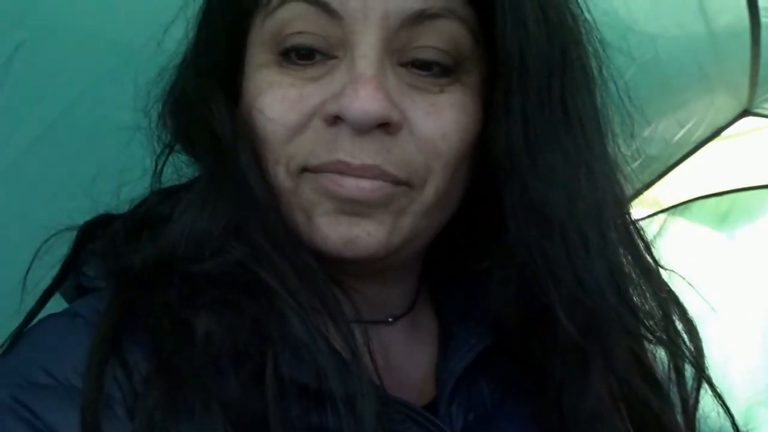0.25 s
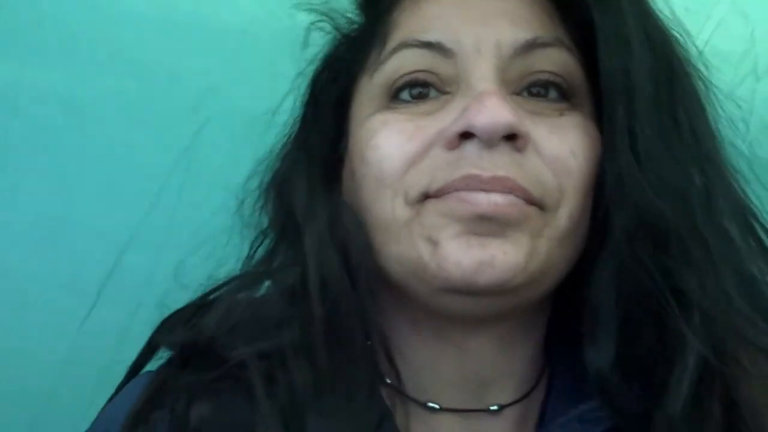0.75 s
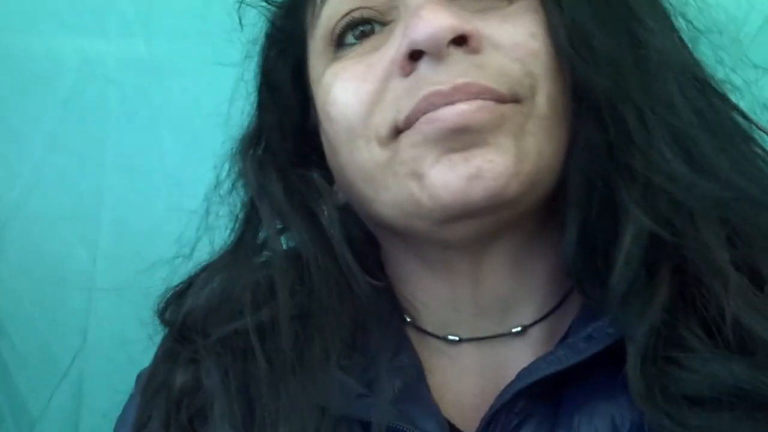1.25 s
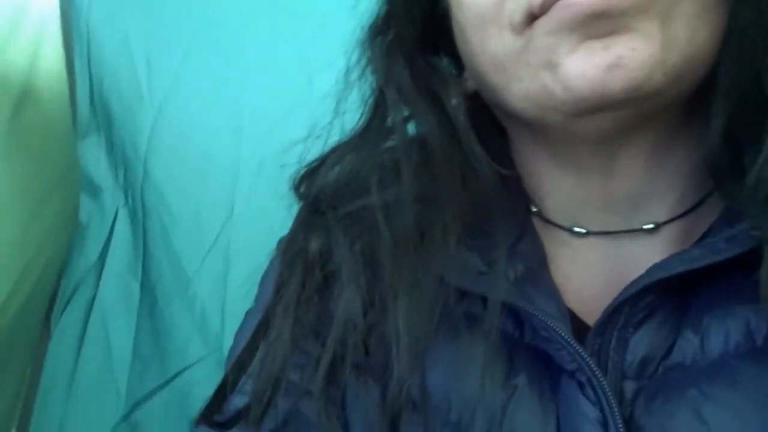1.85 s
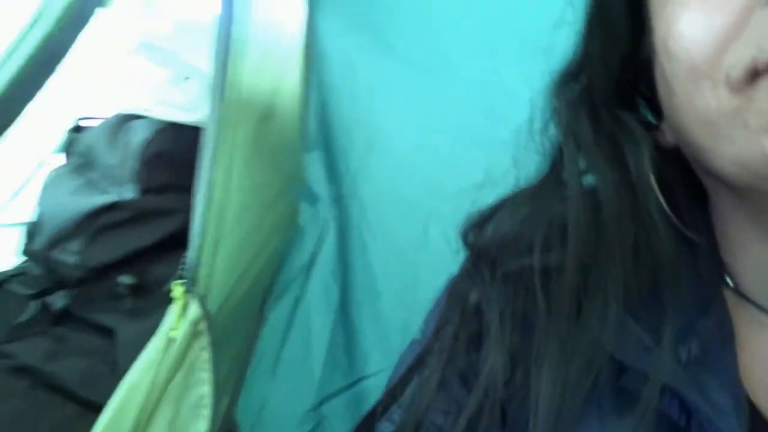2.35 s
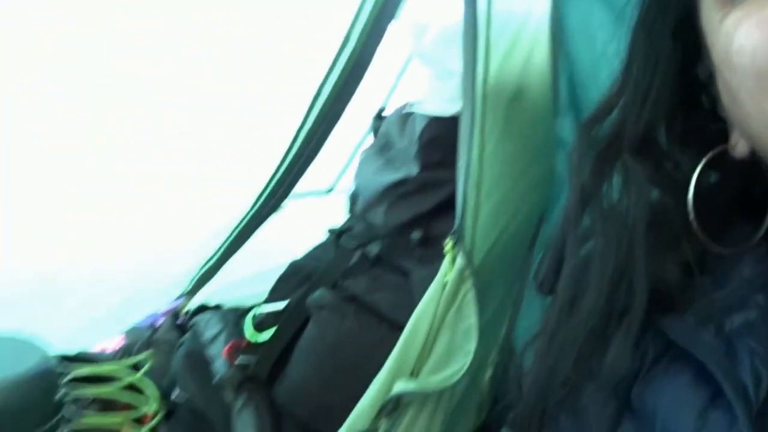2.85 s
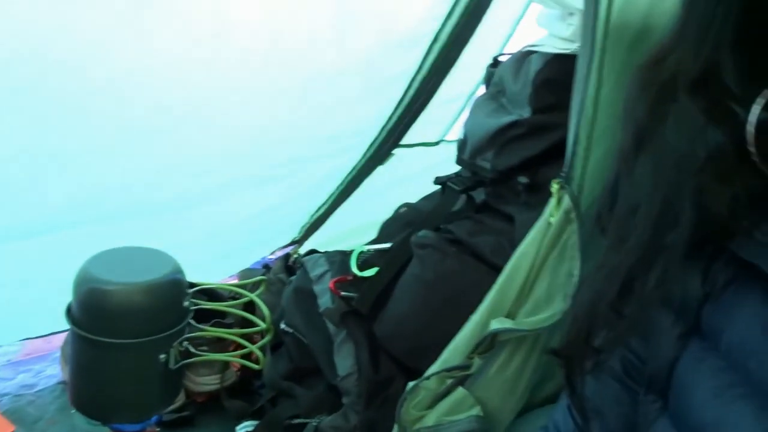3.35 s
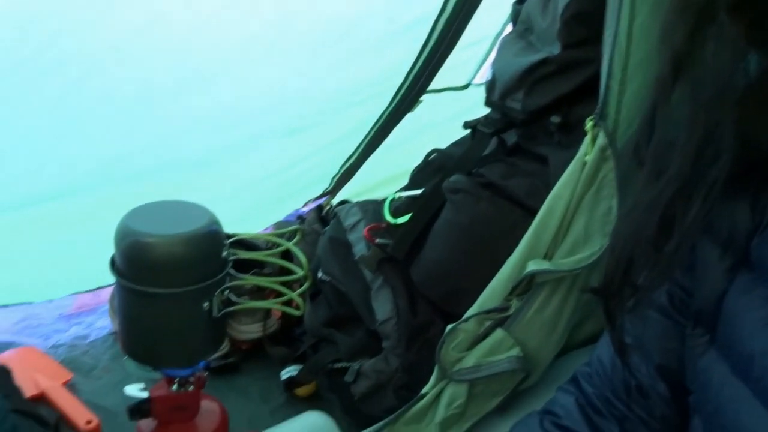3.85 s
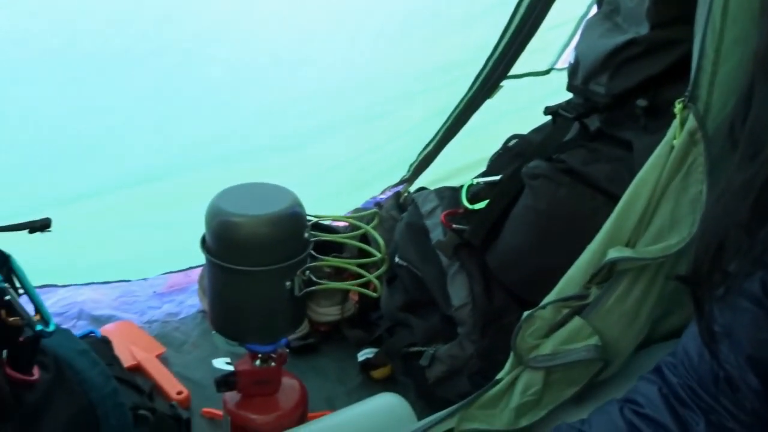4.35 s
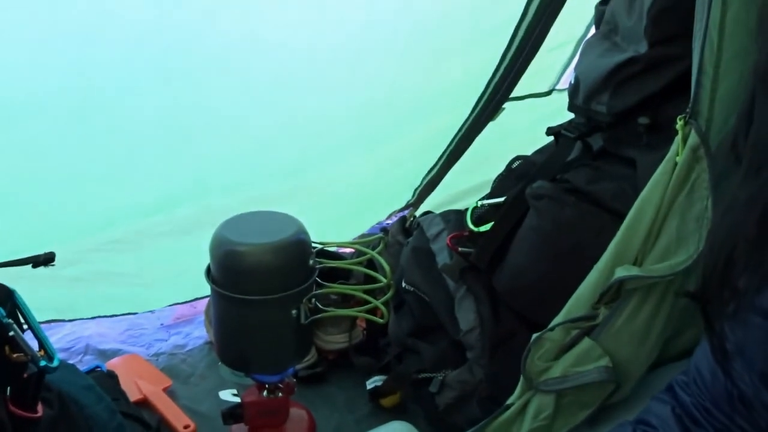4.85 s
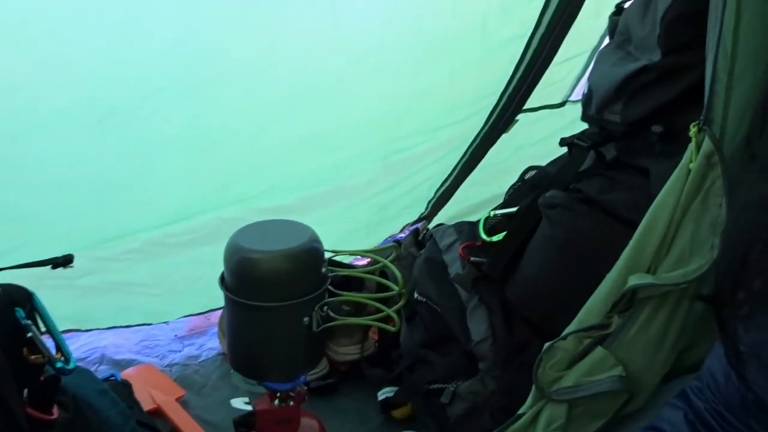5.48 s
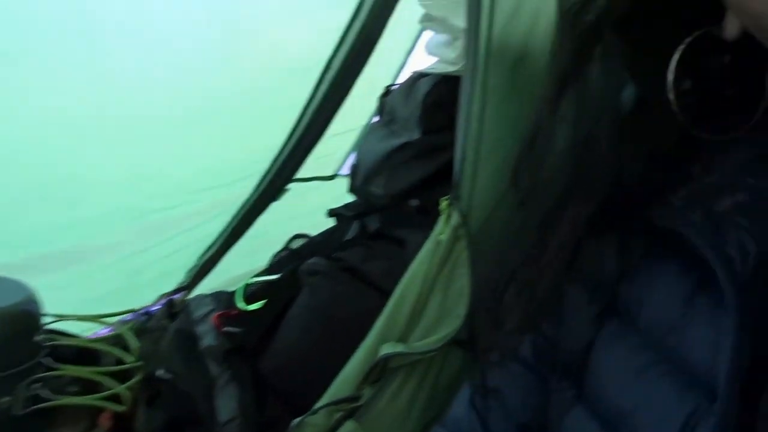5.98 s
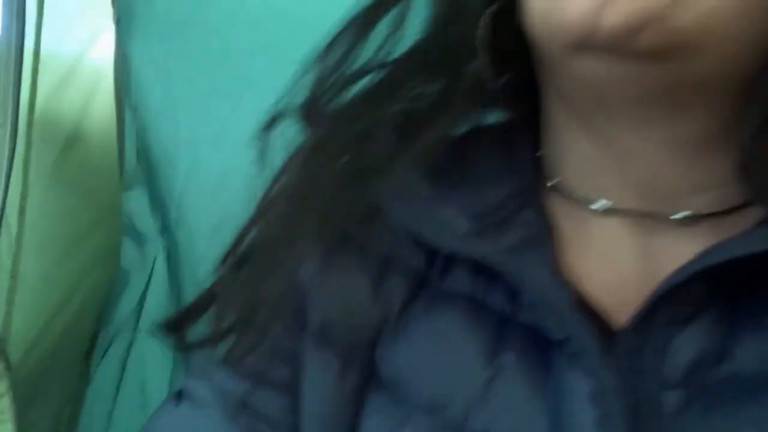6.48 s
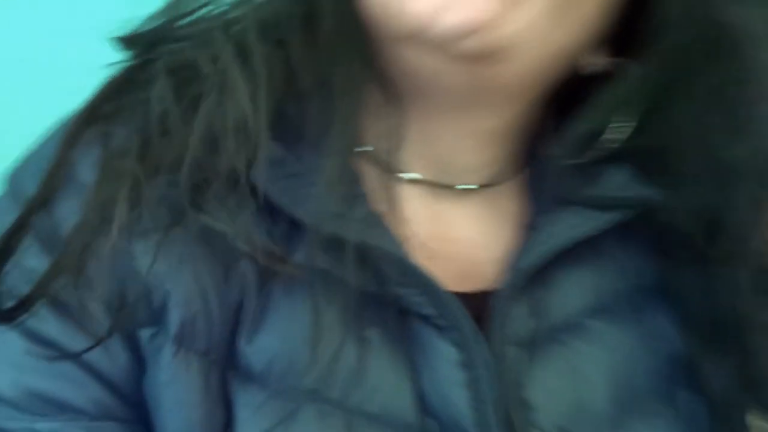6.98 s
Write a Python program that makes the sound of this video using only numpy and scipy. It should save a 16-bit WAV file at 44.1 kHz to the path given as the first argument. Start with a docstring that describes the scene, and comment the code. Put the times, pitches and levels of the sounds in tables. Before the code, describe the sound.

A small gas stove hisses steadily over a soft flame rumble inside a tent. Close to the hand-held microphone, a padded nylon jacket rubs and swishes, and fingers make a few sharp clicks and a dull knock on the plastic case early on. The hiss grows fuller as the microphone turns towards the stove, then eases as it turns away amid heavier rustling.

```python
"""A steady hiss over a soft flame rumble: a small gas stove under a pot in a tent, its turbulent jet
sounding through the burner's resonances. The hiss shifts as a hand-held recorder turns towards the
stove and back. Close by, a padded nylon jacket rubs, swishes and creases, and fingers click and knock
on the recorder's plastic case. A dull wash of air lies underneath."""
import sys
import numpy as np
from scipy import signal
from scipy.fft import rfft, irfft
from scipy.io import wavfile

SR = 44100
rng = np.random.default_rng(int(sys.argv[2]) if len(sys.argv) > 2 else 0)


def bounce(signal):
    """Save signal as a 16-bit WAV file at the path given by the first command-line argument."""
    frames = np.transpose(np.atleast_2d(signal))
    limited = np.clip(frames, -1, 1)
    pcm = np.round(limited * 32767).astype(np.int16)
    wavfile.write(sys.argv[1], SR, pcm)


N = 318344
T = np.arange(N) / SR
HZ = np.maximum(np.fft.rfftfreq(N, 1 / SR), 1)
CUTOFF_HZ = 11030
SIDE_SIGN = np.array([[1], [-1]])  # left, right microphone port


def from_db(db):
    """Decibels to gain."""
    return 10 ** (np.asarray(db) / 20)


def rms_one(x):
    """Scale to unit rms."""
    return x / np.sqrt(np.mean(x ** 2) + 1e-20)


def in_time(rows):
    """Interpolate each column after the time column to every sample."""
    times_s, *columns = np.transpose(rows)
    return [np.interp(T, times_s, column) for column in columns]


def at_hz(points, hz):
    """Read a spectrum on a log-frequency axis."""
    points_hz, values = np.transpose(points)
    return np.interp(np.log(hz), np.log(points_hz), values)


def drift(rate_hz):
    """Smooth random fluctuation, rms 1."""
    return rms_one(irfft(rfft(rng.standard_normal(N)) / (1 + (HZ / rate_hz) ** 2), N))


def resonance(centre_hz, width_hz):
    """Gain of a resonance, peak 1."""
    return 1 / (1 + 2 * ((HZ - centre_hz) / width_hz) ** 2)


def high_pass(x, hz):
    """Second-order bass cut."""
    return signal.sosfilt(signal.butter(2, hz, "high", fs=SR, output="sos"), x)


def to_right(db):
    """Port gains for a source on the right."""
    return from_db(-SIDE_SIGN * db / 2)


def add(out, start_s, sound):
    """Mix in a short sound."""
    start = max(round(start_s * SR), 0)
    out[..., start:start + sound.shape[-1]] += sound[..., :N - start]


def swell(centre_s, half_s):
    """Gaussian envelope, peak 1."""
    return np.exp(-np.minimum(((T - centre_s) / half_s) ** 2, 20))


def slide(start_s, end_s, attack_s=0.03, release_s=0.055):
    """Rise, hold and release of a sliding contact."""
    return np.exp(-np.maximum(start_s - T, 0) / attack_s - np.maximum(T - end_s, 0) / release_s) + 1e-9


def mid_side(mid, side, correlation):
    """Mix two independent noises into a correlated stereo pair."""
    correlation = np.clip(correlation, -1, 1)
    return np.sqrt(1 + correlation) * mid + np.sqrt(1 - correlation) * side * SIDE_SIGN


def stereo_noise(gain, hz=HZ, size=N, correlation=None, lead_rad=0):
    """Coloured stereo noise, rms 1; the left port may lead in phase."""
    # Likeness of the ports. Each row: frequency in Hz, correlation.
    default_correlation = [(30, -0.97), (150, 0.95), (350, 0.9), (800, 0.7), (2000, 0.5), (3300, 0.47),
                           (4600, -0.16), (6500, -0.32), (11000, -0.14)]
    mid, side = rfft(rng.standard_normal((2, size)))
    spectrum = mid_side(mid, side, at_hz(correlation or default_correlation, hz))
    return rms_one(irfft(gain * spectrum * np.exp(1j * SIDE_SIGN * lead_rad / 2), size))


def at_ports(gain, ports):
    """Coloured noise with a source's own correlation and phase lead per frequency."""
    correlation = [(hz, alike) for hz, alike, _ in ports]
    lead_rad = at_hz([(hz, lead) for hz, _, lead in ports], HZ)
    return stereo_noise(gain, correlation=correlation, lead_rad=lead_rad)


def gliding_band(centre_hz, width_hz, correlation, lead_rad=0):
    """Narrow stereo noise with a moving centre, rms 1."""
    spectrum = rfft(rng.standard_normal((2, 2, 1, N)))
    mid, side = irfft(spectrum / np.sqrt(1 + (2 * HZ / width_hz) ** 8), N)
    in_phase, quadrature = mid_side(mid, side, correlation)
    phase = 2 * np.pi * np.cumsum(centre_hz) / SR + SIDE_SIGN * lead_rad / 2
    return rms_one(in_phase * np.cos(phase) + quadrature * np.sin(phase))


def burst(centre_hz, octaves, size=8192):
    """Time axis and short noise with one spectral hump."""
    hz = np.maximum(np.fft.rfftfreq(size, 1 / SR), 1)
    hump = (hz < CUTOFF_HZ) / (1 + np.abs(np.log2(hz / centre_hz) / octaves) ** 3)
    return np.arange(size) / SR, stereo_noise(hump, hz, size)


def snap(t60_s, centre_hz, octaves):
    """A burst that starts near rms 1 and decays."""
    t, noise = burst(centre_hz, octaves)
    decay = from_db(-60 * t / t60_s)
    return rms_one(high_pass(noise * decay, hz=370)) * np.sqrt(np.mean(decay ** 2))


def air(waver_db=1.8, hollow_db=2.5):
    """Low, dull wash around the tent, with a hollow in its middle."""
    # Wash spectrum. Each row: frequency in Hz, relative density in dB.
    spectrum = [(25, -26), (60, -38), (100, -17), (170, -6), (260, -10.5), (400, 2.5), (580, -2.5),
                (900, -4.5), (1500, -16.5), (3000, -16.5)]
    # Wash loudness. Each row: time in seconds, level in dB.
    levels = [(0, -61), (0.6, -63.5), (1.9, -67.5), (2.28, -56.5), (2.55, -70.5), (4.9, -75), (5.55, -64),
              (6.05, -79), (6.6, -60.5), (7.22, -65.5)]
    level_db, = in_time(levels)
    colour_db = at_hz(spectrum, HZ) - hollow_db * resonance(centre_hz=550, width_hz=56)
    return from_db(level_db + waver_db * drift(6.7)) * stereo_noise(from_db(colour_db))


def folds(catch_db=2.0, settle_s=0.2):
    """Sliding folds ring hollow, catch, and sink in pitch as they open."""
    # Each row: start and end in seconds, level in dB, first and settled pitch in Hz.
    slides = [(0.34, 0.46, -58, 2642, 2546), (5.58, 5.68, -55, 1970, 1940), (6.305, 6.36, -51, 2120, 1950),
              (6.43, 6.88, -53, 1788, 1610)]
    gain, centre_hz = 0, np.full(N, float(slides[0][3]))
    for start_s, end_s, db, first_hz, settled_hz in slides:
        envelope = from_db(db) * slide(start_s, end_s)
        sinking_hz = settled_hz + (first_hz - settled_hz) * np.exp(-np.maximum(T - start_s, 0) / settle_s)
        centre_hz = np.where(envelope > gain, sinking_hz, centre_hz)  # loudest fold sets the pitch
        gain = np.maximum(gain, envelope)
    catching = from_db(catch_db * drift(40))
    return gain * catching * gliding_band(centre_hz, width_hz=310, correlation=1.0)


def drags(slips_per_s=1500, size_db=2.5):
    """Cloth drags on the case: creases give way in tiny uneven slips that set it ringing."""
    # Each row: start and end in seconds, level in dB.
    strokes = [(5.462, 5.51, -46), (5.582, 5.658, -42), (6.307, 6.9, -54)]
    # Case resonances under cloth. Each row: frequency and width in Hz, relative level in dB.
    modes = [(706, 125, 0), (1680, 220, -1), (1965, 46, 8.5), (2570, 59, 4), (2950, 99, 7.5),
             (3675, 160, 9.5), (4010, 120, 6.5), (4830, 83, 10), (5450, 100, 4.5), (6700, 250, -1)]
    sizes = from_db(size_db * np.minimum(rng.exponential(1, N), 4))
    slipping = rng.random(N) < slips_per_s / SR
    slips = slipping * sizes * (rng.standard_normal(N) + 0.13 * rng.standard_normal((2, N)))
    ring = 0
    for k, (hz, width_hz, db) in enumerate(modes):
        radius = np.exp(-np.pi * width_hz / SR)
        feedback = [1, -2 * radius * np.cos(2 * np.pi * hz / SR), radius ** 2]
        ring += (-1) ** k * from_db(db) * signal.lfilter([1 - radius, 0, radius - 1], feedback, slips)
    gain = sum(from_db(db) * slide(start_s, end_s) for start_s, end_s, db in strokes)
    return gain * rms_one(ring)


def jacket(sheen_boost_db=3.5, split_hz=4300, catch_db=1.5, grain_db=0.74):
    """Nylon rubs low when pressed and hisses high when gliding; the weave catches in tiny grains."""
    # Arm movement. Each row: time in seconds, rub level in dB, brightness in dB.
    motion = [(0, -53, 1), (0.22, -60, 4), (0.42, -52, -2.5), (0.74, -46.5, -2), (0.97, -46, -4),
              (1.28, -58, -1), (1.66, -61.5, -0.5), (2.1, -51.5, -0.5), (2.4, -50, 1), (2.88, -51.5, 0.5),
              (3.5, -57.5, 2), (4.25, -67.5, 6), (4.95, -63.5, -3), (5.3, -55, -5), (5.6, -52.5, 7.5),
              (5.86, -55, -2), (6.52, -42.5, -1.5), (6.92, -43.5, -9), (7.22, -56.5, -1)]
    # Sleeve swishes. Each row: centre in seconds, sheen before its boost in dB, rub in dB.
    swishes = [(0.1, -51.5, -54.5), (0.61, -67, -71), (0.86, -47, -56), (1.21, -52, -65),
               (1.385, -50.5, -55.5), (1.85, -56, -55.5), (2.02, -56, -46), (3.335, -50, -65),
               (3.57, -54, -66), (3.7, -52, -58), (3.893, -42, -47.5), (4.045, -51.5, -55),
               (4.396, -50, -57), (5.22, -61, -60), (5.49, -53, -67), (5.775, -48.5, -46.5),
               (5.962, -48.5, -47), (6.32, -71, -58)]
    # Nylon spectrum. Each row: frequency in Hz, relative density in dB.
    spectrum = [(200, -32), (400, -22), (800, -4.5), (1250, -4.5), (1650, -1), (2200, 1.5), (2900, 2.5),
                (3600, 5), (4800, 3), (6500, 1.5), (8500, 0.5), (11000, -3)]
    # Nylon at the ports. Each row: frequency in Hz, correlation, left lead in radians.
    ports = [(300, 0.67, 0.5), (1800, 0.59, 0.07), (3200, 0.54, -0.9), (4830, 0.44, -2.3), (7540, 0.41, -3),
             (10800, 0.11, -3.0)]
    motion_db, bright_db = in_time(motion)
    rub_gain, sheen_gain = from_db(motion_db), from_db(motion_db + bright_db)
    for centre_s, sheen_db, rub_db in swishes:
        envelope = swell(centre_s, half_s=0.053)
        rub_gain = np.hypot(rub_gain, from_db(rub_db) * envelope)
        sheen_gain = np.hypot(sheen_gain, from_db(sheen_db) * envelope)
    colour = from_db(at_hz(spectrum, HZ))
    low_share = 1 / (1 + (HZ / split_hz) ** 5)
    rub = rub_gain * at_ports(colour * np.sqrt(low_share), ports)
    sheen = sheen_gain * from_db(sheen_boost_db) * at_ports(colour * np.sqrt(1 - low_share), ports)
    return (rub + sheen + folds()) * from_db(catch_db * drift(21) + grain_db * drift(700))


def brushes(catch_db=1.5):
    """Quick scuffs of cloth on the case swell and fade, catching unevenly."""
    # Each row: peak time in seconds, level in dB, half length in seconds, centre in Hz, width in octaves.
    scuffs = [(0.079, -43, 0.003, 2900, 0.87), (0.091, -37, 0.0049, 3440, 0.53),
              (2.004, -39.5, 0.0042, 2200, 0.25), (2.04, -42, 0.0064, 2480, 0.26),
              (2.131, -46.5, 0.021, 3240, 0.32), (2.355, -41.5, 0.011, 4170, 0.4),
              (3.881, -34, 0.0083, 3700, 1.4), (3.894, -38, 0.006, 6000, 1.2),
              (5.404, -38, 0.0066, 5300, 0.54), (5.571, -53.5, 0.0091, 268, 0.14),
              (5.489, -44, 0.03, 5040, 0.17), (5.588, -38, 0.012, 4440, 1.4),
              (5.64, -39.5, 0.004, 3000, 1.2), (5.675, -35, 0.0035, 4700, 0.61),
              (5.768, -39.5, 0.024, 4700, 0.46), (6.318, -43, 0.025, 4050, 0.12),
              (6.479, -52.5, 0.0091, 380, 0.35), (6.626, -52.5, 0.0055, 560, 0.67),
              (6.624, -44, 0.008, 2000, 0.13), (6.759, -38, 0.0049, 1240, 2.2),
              (6.778, -38.5, 0.0045, 1730, 1.2), (6.91, -36.5, 0.014, 1410, 2.04)]
    out = np.zeros((2, N))
    for peak_s, db, half_s, centre_hz, octaves in scuffs:
        t, noise = burst(centre_hz, octaves)
        add(out, peak_s - t.mean(), from_db(db) * noise / np.cosh((t - t.mean()) / half_s))
    return high_pass(out * from_db(catch_db * drift(110)), hz=231)


def snaps():
    """Nylon creases, light taps and the short ring of finger clicks on the case: sudden, fast-dying."""
    # Each row: start in seconds, level in dB, centre in Hz, width in octaves, t60 in seconds.
    creases_and_taps = [(0.0925, -39, 3640, 0.45, 0.025), (0.5518, -34.5, 1540, 0.35, 0.027),
                        (0.565, -37.5, 4000, 0.91, 0.037), (0.6373, -38, 1260, 0.31, 0.028),
                        (0.638, -35.5, 3000, 0.96, 0.031), (1.034, -35, 1600, 1.4, 0.043),
                        (1.0529, -23, 2520, 0.48, 0.025), (1.0565, -26, 820, 0.25, 0.018),
                        (1.063, -38.5, 850, 0.3, 0.03), (1.0762, -26.5, 1940, 0.27, 0.017),
                        (1.1166, -43, 1700, 0.82, 0.02), (1.243, -48.5, 616, 0.36, 0.04),
                        (1.25, -37, 1930, 0.4, 0.018), (1.516, -31, 2300, 0.36, 0.01),
                        (1.6738, -30.5, 2500, 1.74, 0.029), (1.813, -41, 1930, 0.12, 0.03),
                        (2.229, -40.5, 725, 0.82, 0.033), (2.2322, -28, 2400, 0.41, 0.031),
                        (2.3419, -38, 2350, 0.47, 0.028), (2.519, -39.5, 1400, 1.1, 0.024),
                        (3.1862, -42, 2160, 0.39, 0.027), (3.3333, -40.5, 2000, 0.49, 0.036),
                        (3.9135, -34, 2600, 1.1, 0.03), (3.914, -39.5, 715, 0.22, 0.032),
                        (3.915, -33.5, 2050, 0.39, 0.032), (3.976, -40.5, 860, 2.4, 0.032),
                        (4.4038, -40, 1770, 1.1, 0.028), (4.4442, -40.5, 1790, 2.2, 0.036),
                        (4.846, -39.5, 3330, 0.81, 0.039), (5.1657, -42.5, 1475, 1.3, 0.032),
                        (5.3912, -33.5, 2010, 2.9, 0.031), (5.5023, -41, 1800, 2.8, 0.034),
                        (5.5603, -28.5, 2300, 1.0, 0.034), (5.564, -29, 4940, 0.52, 0.035),
                        (5.5795, -28.5, 4300, 0.52, 0.03), (5.612, -39, 5000, 1.0, 0.02),
                        (5.6359, -37.5, 1300, 2.2, 0.04), (5.6655, -32.5, 3800, 1.0, 0.015),
                        (5.7678, -31, 5400, 0.2, 0.046), (5.797, -45, 2110, 0.89, 0.03),
                        (5.808, -42, 1900, 0.61, 0.025), (6.294, -35.5, 2505, 1.2, 0.035),
                        (6.459, -37, 1900, 1.4, 0.044), (6.525, -43, 2500, 0.84, 0.027),
                        (6.642, -28.5, 4200, 0.87, 0.041), (6.707, -44, 900, 0.23, 0.035),
                        (6.9991, -38.5, 1900, 0.78, 0.025)]
    out = np.zeros((2, N))
    for start_s, db, centre_hz, octaves, t60_s in creases_and_taps:
        add(out, start_s, from_db(db) * snap(t60_s, centre_hz, octaves))
    return out


def strike(modes, scatter_db, rock_hz=np.inf, size=4096):
    """One blow on the case: modes alternate in sign; the higher a mode, the more it rocks the ports against
    each other, a quarter cycle apart at rock_hz and nearing opposition far above."""
    hz, db, t60_s = np.transpose(modes)[:, :, None]
    t = np.arange(size) / SR
    polarity = (-1) ** np.arange(len(hz))[:, None]
    strength = polarity * from_db(db + scatter_db * rng.standard_normal((len(hz), 1)))
    rock_rad = SIDE_SIGN[:, :, None] * np.arctan(hz / rock_hz)
    return np.sum(strength * from_db(-60 * t / t60_s) * np.sin(2 * np.pi * hz * t + rock_rad), axis=1)


def handling():
    """Finger blows travel through the case: sharp clicks with a bright crack, and dull knocks."""
    # Each row: start in seconds, ring in dB, crack in dB, right minus left of the ring in dB.
    clicks = [(1.0494, -8.5, -28, -3.5), (1.0511, -21, -29, 10), (1.0554, -27, -29, -7),
              (1.0627, -32, -32, 0), (1.0753, -26, -25.5, 0), (2.2285, -9.5, -35, 0.5),
              (2.2315, -20.5, -43, 3)]
    # Each row: start in seconds, level in dB.
    knocks = [(1.6718, -25), (1.675, -28), (1.681, -32), (1.691, -15.5), (5.5616, -35), (6.758, -36),
              (6.904, -37), (6.913, -38)]
    # Modes of the ringing and of the gripped case. Each row: frequency in Hz, level in dB, t60 in seconds.
    case_modes = [(725, -38, 0.026), (1980, -20, 0.017), (2310, -12.5, 0.017), (2640, -14, 0.016),
                  (3320, -22, 0.022), (3910, -3, 0.011), (4330, 0.5, 0.011), (5500, -8.5, 0.02),
                  (5860, -10.5, 0.012), (9220, -18, 0.012)]
    grip_modes = [(187, -29.5, 0.018), (329, -17, 0.033), (757, -10, 0.0097), (985, -9, 0.019),
                  (1610, -20, 0.023), (2820, -12.5, 0.0056)]
    out = np.zeros((2, N))
    for start_s, ring_db, crack_db, pan_db in clicks:
        ring = strike(case_modes, scatter_db=2.5, rock_hz=2900)
        add(out, start_s, from_db(ring_db) * ring * to_right(pan_db))
        add(out, start_s, from_db(crack_db) * snap(t60_s=0.016, centre_hz=8800, octaves=1.0))
    for start_s, db in knocks:
        add(out, start_s, from_db(db) * strike(grip_modes, scatter_db=2.0) * to_right(db=3.5))
    return out


def burner_bands(exposure, lift_db, waver_db=1.2, wander_hz=25):
    """Three hiss bands shift and grow as the recorder comes into the burner's path."""
    # Each row: shadowed and direct centre in Hz, width in Hz, shadowed and direct level in dB,
    # share of the lift, shadowed and direct left lead in radians.
    bands = [(3860, 3500, 287, -57, -54, 0.77, 1.45, 0.33), (4315, 4090, 330, -57, -50.5, -0.17, 2.2, 1.1),
             (4750, 5060, 160, -65.5, -61.5, 0.3, 1.9, 0.63)]
    out = 0
    for shadow_hz, direct_hz, width_hz, shadow_db, direct_db, share, shadow_rad, direct_rad in bands:
        band_db = shadow_db + exposure * (direct_db - shadow_db) + share * lift_db + waver_db * drift(27)
        centre_hz = shadow_hz + exposure * (direct_hz - shadow_hz) + wander_hz * drift(4)
        lead_rad = shadow_rad + exposure * (direct_rad - shadow_rad)
        out += from_db(band_db) * gliding_band(centre_hz, width_hz, correlation=0.93, lead_rad=lead_rad)
    return out * to_right(db=0.9)


def stove(shadow_db=-60, direct_db=-50, flutter_db=0.8):
    """Turbulent gas: a broad hiss with hollows and bands, over resonances of flame, pot and burner."""
    # Recorder aim. Each row: time in seconds, exposure (0 shadowed, 1 direct), hiss gain in dB,
    # band lift in dB.
    aim = [(0, 0.072, -5, 6), (0.4, 0.0011, 2, -4), (1.2, 0.58, -0.5, -1), (1.7, 0.52, 1, -5),
           (2.35, 0.15, 2, 2), (2.6, 0.08, 6, -3.5), (2.73, 0.13, 4, 5), (2.97, 0.3, 0.5, 9.5),
           (3.18, 0.59, -1, 7.5), (3.45, 0.81, -2, 2.5), (4.1, 0.94, 0, -1), (5.35, 0.98, 0, -3.5),
           (5.95, 0.95, 0.5, -6), (6.33, 0.26, 4, 2), (6.75, 0.13, -1.5, -13), (7.22, 0.21, -2.5, 3)]
    # Gas jet spectrum. Each row: frequency in Hz, relative density in dB.
    jet_spectrum = [(300, -35), (1100, -8.5), (1400, -8.5), (1750, -11.5), (2600, -8.5), (3100, 0),
                    (3750, 1.5), (4500, 4.5), (5700, -4), (6500, -5), (7800, -15), (9000, -7.5), (9700, -9),
                    (11000, -19.5)]
    # Jet at the ports. Each row: frequency in Hz, correlation, left lead in radians.
    jet_ports = [(250, 0.92, -1.5), (900, 0.58, 0.5), (3100, 0.7, -0.3), (4500, 0.6, 2.06), (5800, 0.43, 1),
                 (7500, 0.23, 3), (11000, 0.15, 3.5)]
    # Spectral dips. Each row: centre and width in Hz, depth in dB.
    hollows = [(556, 60, 14), (1080, 48, 9), (1460, 70, 4), (1760, 88, 16), (3080, 140, 14), (3640, 80, 12),
               (9660, 270, 9)]
    # Flame, pot and burner resonances. Each row: centre and width in Hz, level in dB.
    modes = [(229, 123, -76), (284, 98, -72.5), (802, 190, -69.5), (2410, 250, -67.5), (5710, 530, -61.5)]
    exposure, hiss_db, lift_db = in_time(aim)
    hollow_db = sum(depth_db * resonance(hz, width_hz) for hz, width_hz, depth_db in hollows)
    jet_gain = from_db(shadow_db + exposure * (direct_db - shadow_db))
    jet = jet_gain * at_ports(from_db(at_hz(jet_spectrum, HZ) - hollow_db), jet_ports)
    body = sum(from_db(db) * stereo_noise(resonance(hz, width_hz) * from_db(-hollow_db))
               for hz, width_hz, db in modes)
    hiss = from_db(hiss_db) * (jet + burner_bands(exposure, lift_db))
    return (hiss + body) * from_db(flutter_db * drift(20))


def scene(dip_db=-12.5):
    """Stove ahead, jacket slightly right, fingers on the case; the level dips briefly once."""
    cloth_and_taps = (jacket() + drags() + brushes() + snaps()) * to_right(db=1.3)
    dip = from_db(dip_db * swell(centre_s=0.476, half_s=0.0052))
    return (stove() + air() + cloth_and_taps + handling()) * dip


def record(dry, low_cut_hz=135):
    """The recorder thins the bass and cuts the top."""
    low_pass = signal.ellip(12, 0.1, 80, CUTOFF_HZ, fs=SR, output="sos")
    return signal.sosfilt(low_pass, high_pass(dry, low_cut_hz))


dry = scene()
out = record(dry)
bounce(out)
```